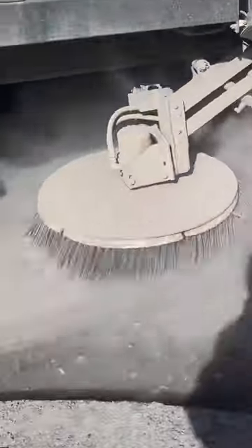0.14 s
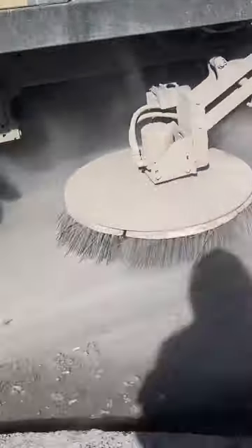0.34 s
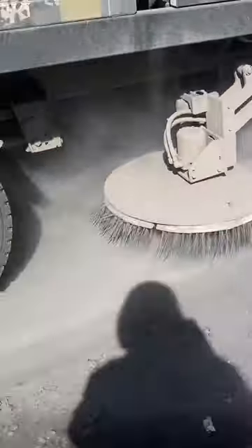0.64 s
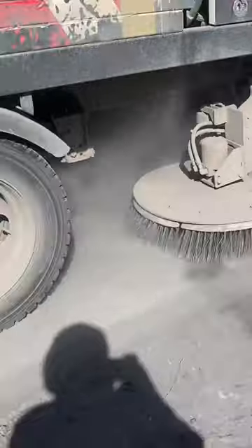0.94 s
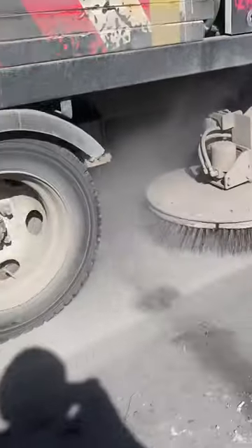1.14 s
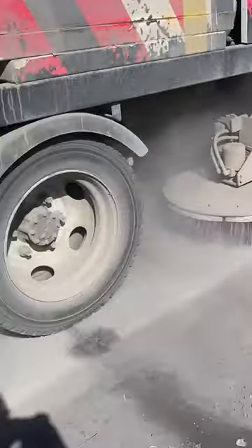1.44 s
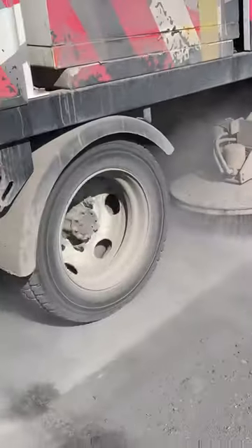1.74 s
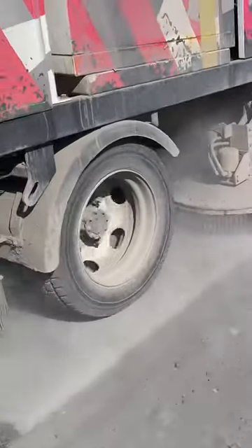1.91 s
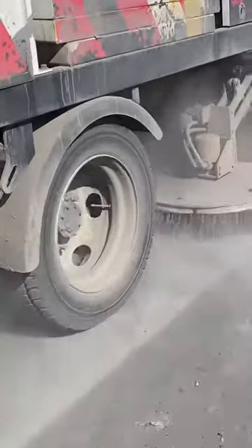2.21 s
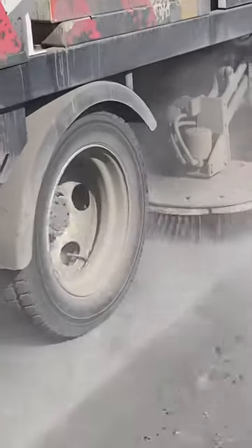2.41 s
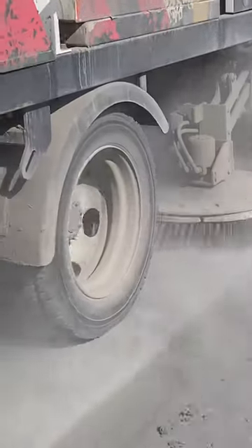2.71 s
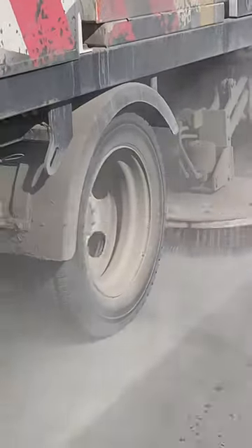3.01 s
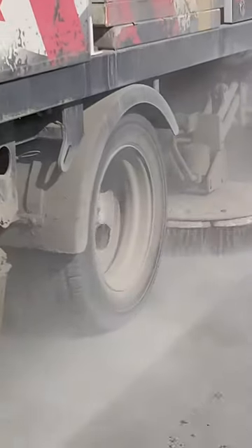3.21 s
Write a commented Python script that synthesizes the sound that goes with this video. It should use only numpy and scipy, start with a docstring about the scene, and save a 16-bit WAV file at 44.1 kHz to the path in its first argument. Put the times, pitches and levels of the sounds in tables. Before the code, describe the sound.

A road sweeper creeps past very close outdoors, sounding throughout. From 0 s a dense, very bright bristle hiss dominates, over a rough suction blower roar and a low, fluttering diesel rumble. The hiss weakens gradually until about 1.5 s, then stays nearly level. The blower surges briefly around 1.7 and 2.05 s, with faint wavering tones, then thins slightly; the engine keeps throbbing until the abrupt end near 3.4 s. Wide stereo.

```python
"""Road sweeper passing by

A road sweeper creeps past at arm's length outdoors and slowly draws away. Its diesel rumbles: wandering exhaust
tones over low noise that throbs with each crankshaft turn. Its suction blower roars: coloured noise in two
surging parts, with a few faint tones. Wire bristles of a disc brush hiss on dusty asphalt: dense random flicks,
heard with a strong peak near 12 kHz. Two microphone ports hear it all, partly alike and out of phase."""
import sys
import numpy as np
from scipy import signal
from scipy.fft import rfft, irfft
from scipy.io import wavfile
from scipy.ndimage import uniform_filter1d

SR = 44100
rng = np.random.default_rng(int(sys.argv[2]) if len(sys.argv) > 2 else 0)


def ratio(d):
    """dB to gain"""
    e = np.asarray(d, float) / 20
    return 10 ** e


def unload_audio(sound):
    """Save the sound as a 16-bit wav file, at the path given as the first command line argument."""
    columns = np.transpose(np.atleast_2d(sound))
    # keep every value between -1 and 1, then stretch to whole-number steps
    steps = np.round(np.clip(columns, -1, 1) * 32767)
    wavfile.write(sys.argv[1], SR, steps.astype(np.int16))


N = 148176
HZ = np.fft.rfftfreq(N, 1 / SR)

# uneven swells of the low rumble (taken around their mean) and strength of three beating exhaust orders:
# time_s, swell_db, third_db, fourth_db, sixth_db
ENGINE_CURVE = [(0.0, -54, -36, -45, -61), (0.07, -42, -45, -42, -38.5), (0.11, -52, -45, -45, -50),
                (0.18, -43, -60, -41, -52), (0.23, -50.5, -37, -42, -52), (0.42, -43, -37, -35.5, -38.5),
                (0.45, -44, -40, -45, -54), (0.54, -43, -47, -51, -39), (0.6, -43, -35, -39, -35.5),
                (0.73, -50, -41, -37, -38), (0.83, -37, -35.5, -59, -40), (0.91, -53, -39, -46, -49),
                (1.06, -39, -27.5, -41.5, -50), (1.12, -48, -52, -35, -43), (1.18, -44, -29, -43, -52),
                (1.23, -41, -44, -43, -42), (1.25, -47, -39, -37, -64), (1.33, -42, -30, -49, -46),
                (1.38, -48, -43, -56, -54), (1.43, -44, -30, -39, -48), (1.48, -47, -43, -49, -48),
                (1.54, -37, -36.5, -47, -39.5), (1.59, -52.5, -52, -46, -53),
                (1.65, -42, -34.5, -47, -36.5), (1.81, -43.5, -40, -32, -42.5),
                (1.91, -44, -29, -43, -43.5), (1.97, -40, -54, -49, -49), (2.03, -43, -39, -48, -45),
                (2.12, -42.5, -56, -51, -42), (2.17, -39, -34, -51, -44.5), (2.24, -49.5, -42, -34, -46.5),
                (2.34, -36, -37, -50, -43), (2.37, -49, -41, -28, -56), (2.41, -38, -33, -29, -45),
                (2.48, -42.5, -54, -30, -54), (2.56, -39, -45, -33, -43), (2.61, -49, -39, -54, -63),
                (2.65, -45, -46, -43, -43), (2.7, -36.5, -43, -41, -37), (2.75, -47, -45, -52, -48),
                (2.79, -41.5, -36, -51, -39), (2.85, -43, -39, -34, -52), (2.91, -42, -43, -52, -41),
                (2.97, -44.5, -47, -38, -49), (3.11, -42.5, -51, -50, -66), (3.15, -45, -32, -47, -44),
                (3.21, -44, -57, -53, -57), (3.25, -41.5, -51, -46, -51), (3.32, -50.5, -54, -60, -53),
                (3.36, -55, -51, -55, -58)]
# exhaust orders, levels added to the curve: multiple of the crankshaft rate, level_db, wander_width_hz
ENGINE_ORDERS = [(3, -0.5, 3.8), (4, -2.5, 9.7), (6, 0, 11)]
# spectrum of the body and exhaust rumble: frequency_hz, density_db (per Hz)
RUMBLE_COLOUR = [(20, -33), (35, -17), (55, -2.5), (84, 0), (115, -14), (165, -8.5), (215, -7.5),
                 (265, -9.5), (330, -21), (500, -27.5)]

# blower air flow as the truck turns its flank, before a common lift: time_s, low_roar_db, high_roar_db
BLOWER_CURVE = [(0, -37, -39), (.45, -37, -37.5), (.8, -40.5, -38.5), (1.1, -41, -37), (1.4, -43, -38.5),
                (1.58, -41, -38), (1.67, -37.5, -38), (1.8, -41.5, -40.5), (1.9, -44.5, -39),
                (2.05, -36, -40), (2.16, -43, -41.5), (2.4, -42.5, -42), (2.8, -42.5, -42), (3.1, -49, -42),
                (3.36, -45, -43.5)]
# spectrum of the blower roar: frequency_hz, density_db (per Hz)
BLOWER_COLOUR = [(150, 11), (330, -6.5), (430, 2), (540, 3.5), (620, 1), (850, 0.5), (1050, 0), (1400, 2.5),
                 (1950, 2), (2500, -0.5), (4000, -2), (5400, -4), (8000, -9)]
# blower tones, levels added to the curves below: pitch_hz, level_db, wander_width_hz
BLOWER_TONES = [(326.5, 1, 2.5), (466.5, -2, 5.4), (654.4, 0, 4.4)]
# the three blower tones come and go: time_s, first_db, second_db, third_db
TONE_CURVES = [(0.0, -43.5, -54, -57), (0.13, -54.5, -56, -45), (0.24, -65, -69, -54),
               (0.36, -49, -64, -53), (0.89, -66, -63, -58), (1.09, -50, -64, -59), (1.22, -62, -54, -54),
               (1.28, -57, -54, -68), (1.43, -50.5, -65, -61), (1.58, -50, -55, -63), (1.66, -51, -68, -56),
               (1.8, -47.5, -45, -50), (1.9, -56, -62, -54), (2.08, -45.5, -53, -61),
               (2.14, -61, -50.5, -54), (2.33, -44.5, -52.5, -62), (2.51, -67, -60, -67),
               (3.13, -56.5, -59.5, -73), (3.22, -73, -52, -56), (3.36, -74, -76, -70)]

# brush on the road, fading with distance, before a small lift: time_s, level_db
BRUSH_CURVE = [(0, -23.5), (.4, -24.5), (.9, -26), (1.4, -28), (1.68, -27.5), (1.9, -28.5), (2.5, -28.5),
               (3.05, -29.5), (3.36, -28.5)]
# spectrum of the bristle hiss as heard, nearly empty near 14.8 kHz: frequency_hz, density_db (per Hz)
BRUSH_COLOUR = [(2500, -40), (5400, -26), (6600, -19), (8600, -12.1), (10300, -8.5), (11200, -3.5),
                (12050, 0), (12620, -2.6), (13220, -9.6), (13750, -16), (14200, -29), (14600, -45),
                (15050, -45), (15250, -25), (16000, -24)]

# stereo likeness, phase and balance as heard:
# frequency_hz, likeness (0 to 1), left_lead_rad, left_minus_right_db
PORTS = [(100, .98, -.2, .4), (400, .89, -.1, .3), (650, .6, .4, -4), (850, .85, 1.4, 0),
         (1200, .75, 1.4, 0), (1500, .72, 3.5, -3.4), (1900, .7, 5.0, -.8), (2300, .88, 6.3, 0),
         (2700, .3, 7.4, -.3), (3300, .2, 7.3, -.5), (4000, .45, 6.5, -1.5), (4700, .25, 7.8, -3.4),
         (5400, .55, 9.2, -3.7), (6000, .15, 11.5, -3.8), (6600, .8, 12.5, 0), (7200, .45, 11.6, .4),
         (7600, .85, 10.2, 0), (7800, .89, 9.75, 0), (8200, .93, 9.55, 0), (8350, 1, 9.425, 0),
         (8850, 1, 9.425, 0), (9100, .85, 9.1, 0), (9600, .72, 8.2, 0), (10250, .83, 7.0, 0),
         (10400, .96, 6.5, 0), (10700, 1, 6.283, 0), (11050, 1, 6.283, 0), (11600, .985, 6.1, 0),
         (11800, .95, 5.3, 0), (12600, .94, 4.35, 0), (12950, .88, 3.6, 0), (13150, 1, 3.142, 0),
         (14600, 1, 3.142, 0), (14900, 1, 0, 0)]

CRANK_HZ, CRANK_WANDER = 23.99, 0.0265  # mean crankshaft turns per second; spread as a share of it
THROB_DB, LOPE_DB = 1, 1  # peak swing of the rumble once a turn; of the orders once every two turns
RUMBLE_DB, RUMBLE_FLICKER_DB = -37.5, 0.1
RUMBLE_FOLLOWS = 0.66  # dB of rumble per dB of swell
BLOWER_LIFT_DB, BLOWER_FLICKER_DB = 4, 0.3
PATCHY_DB, PATCHES_PER_S = 1.0, 8.5  # spread of the swells; cutoff of their drift in Hz
BRUSH_LIFT_DB, BRUSH_FLICKER_DB = 1, 0.55
BRISTLES_PER_S, BRISTLE_SPREAD_DB = 34000, -1.3  # flicks per second; mean random weakening
STREAK_DB, STREAK_FROM_HZ = 2.2, 600
LOW_CUT_HZ = 40


def rms_one(x):
    """Scales a signal to rms 1."""
    return x / np.sqrt(np.mean(x ** 2) + 1e-20)


def in_time(rows):
    """Draws the columns of a time curve as straight lines, one value for every sample."""
    time_s, *columns = np.transpose(rows)
    return [np.interp(np.arange(N) / SR, time_s, column) for column in columns]


def drift(rate_hz):
    """Slow chance of spread 1: noise at every 40th sample, twice through a one-pole low-pass."""
    r = np.exp(-80 * np.pi * rate_hz / SR)
    noise = rng.standard_normal(N // 40 + 2002)
    slow = signal.lfilter([1], [1, -2 * r, r * r], noise)[2000:]  # skips the filter's start
    return np.interp(np.arange(N) / 40, np.arange(len(slow)), rms_one(slow))


def flutter(rate_hz):
    """Drift without its slowest swings, with spread 1."""
    chance = drift(rate_hz)
    return rms_one(chance - uniform_filter1d(chance, size=SR // 9))


def coloured(x, colour):
    """Filters two streams with a spectrum curve and scales them together to rms 1."""
    hz, db = np.transpose(colour)
    gain = ratio(np.interp(np.log(HZ + 1), np.log(hz), db))
    return rms_one(irfft(rfft(x) * gain, N))


def rough_tone(turns, width_hz, steady):
    """Two streams of a tone, each a steady part plus one of wandering strength and phase; rms about 1."""
    steady = np.clip(steady, 0, 1)  # share of the power that does not wander
    streams = []
    for _ in range(2):
        constant = np.sqrt(steady) * np.exp(2j * np.pi * rng.random())
        wander = np.sqrt((1 - steady) / 2) * (drift(width_hz) + 1j * drift(width_hz))
        streams.append(np.real((constant + wander) * np.exp(2j * np.pi * turns)))
    return np.array(streams) * np.sqrt(2)


def patchy(x):
    """Lets every third of an octave from 400 Hz to about 5 kHz swell and sink on its own."""
    spectrum, out = rfft(x), x.copy()
    for hz in 400 * 2 ** (np.arange(12) / 3):
        bell = np.maximum(1 - 3 * np.abs(np.log2((HZ + 1) / hz)), 0)
        swell = ratio(PATCHY_DB * drift(PATCHES_PER_S))
        out += irfft(spectrum * bell, N) * (swell - 1)
    return out


def streaky(x):
    """Breaks sound into streaks about 60 Hz wide and 50 ms long, each louder or softer than the next."""
    hz, _, cells = signal.stft(x, SR, nperseg=1024)
    noise = rng.standard_normal(cells.shape[1:])
    chance = rms_one(uniform_filter1d(noise, size=4, axis=1))  # smooth along time
    gain = rms_one(ratio(STREAK_DB * chance))
    gain = np.where(hz[:, None] > STREAK_FROM_HZ, gain, 1)
    return signal.istft(cells * gain, SR, nperseg=1024)[1][:, :N]


def exhaust_orders(turns, orders_db):
    """Rough tones at multiples of the crankshaft rate; uneven cylinders make them throb
    once every two turns, one four-stroke cycle."""
    orders = 0
    for (multiple, db, width_hz), now_db in zip(ENGINE_ORDERS, orders_db):
        orders = orders + ratio(db + now_db) * rough_tone(multiple * turns, width_hz, steady=0.85)
    return orders * ratio(LOPE_DB * np.cos(np.pi * turns + 1.65 * drift(2.3)))


def rumble(turns, swell_db):
    """Low body and exhaust noise that follows the swell curve and throbs once per crankshaft turn."""
    throb_db = THROB_DB * np.cos(2 * np.pi * turns) + RUMBLE_FLICKER_DB * drift(22.0)
    follow_db = RUMBLE_FOLLOWS * (swell_db - swell_db.mean())
    noise = coloured(rng.standard_normal((2, N)), RUMBLE_COLOUR)
    return ratio(RUMBLE_DB + follow_db + throb_db) * noise


def engine():
    """Diesel: exhaust orders and rumble share one crankshaft whose speed wanders."""
    turns = np.cumsum(CRANK_HZ * (1 + CRANK_WANDER * drift(2.8))) / SR  # crankshaft turns so far
    swell_db, *orders_db = in_time(ENGINE_CURVE)
    return exhaust_orders(turns, orders_db) + rumble(turns, swell_db)


def blower_roar():
    """Turbulent air as patchy noise, split near 1200 Hz into two parts that surge apart."""
    low_db, high_db = in_time(BLOWER_CURVE)
    air = patchy(coloured(rng.standard_normal((2, N)), BLOWER_COLOUR))
    low = signal.sosfilt(signal.butter(1, 1200, fs=SR, output="sos"), air)
    high = air - low
    low = low * ratio(low_db + BLOWER_FLICKER_DB * flutter(3.4))
    high = high * ratio(high_db + BLOWER_FLICKER_DB * flutter(4.6))
    return ratio(BLOWER_LIFT_DB) * (low + high)


def blower_tones():
    """Faint blower tones that waver in strength and phase, and come and go."""
    tones = 0
    for (hz, db, width_hz), now_db in zip(BLOWER_TONES, in_time(TONE_CURVES)):
        turns = hz * np.arange(N) / SR
        tones = tones + ratio(db + now_db) * rough_tone(turns, width_hz, steady=0.76)
    return tones


def blower():
    """Suction blower: the roar of its air flow plus its tones."""
    return blower_roar() + blower_tones()


def brush():
    """Dense bristle flicks of uneven size blur into a hiss whose strength flutters."""
    hits = rng.random((2, N)) < BRISTLES_PER_S / SR
    flicks = hits * rng.standard_normal((2, N))
    flicks = flicks * ratio(BRISTLE_SPREAD_DB * rng.exponential(1, (2, N)))
    level_db = in_time(BRUSH_CURVE)[0] + BRUSH_LIFT_DB + BRUSH_FLICKER_DB * flutter(28.0)
    return ratio(level_db) * coloured(flicks, BRUSH_COLOUR)


def scene():
    """Two unrelated streams of one machine: sound both ports share, and the scattered part."""
    return engine() + streaky(blower() + brush())


def roll_off(x):
    """The treble ends steeply here."""
    return signal.sosfilt(signal.butter(12, 15800, fs=SR, output="sos"), x)


def record(dry):
    """After a low cut, two ports mix shared and scattered sound, shifted in phase and uneven in level."""
    hz, *columns = np.transpose(PORTS)
    alike, lead_rad, lean_db = [np.interp(HZ, hz, column) for column in columns]
    alike = np.clip(alike, 0, 1)
    low_cut = signal.butter(2, LOW_CUT_HZ, "high", fs=SR, output="sos")
    spectra = rfft(signal.sosfilt(low_cut, dry))
    shared = spectra[0] * np.sqrt((1 + alike) / 2)
    scattered = spectra[1] * np.sqrt((1 - alike) / 2)
    turn = np.exp(0.5j * lead_rad) * ratio(lean_db / 2)  # half to the left, the opposite half to the right
    left, right = (shared + scattered) * turn, (shared - scattered) / turn
    return roll_off(irfft(np.array([left, right]), N))


dry = scene()
out = record(dry)
unload_audio(out)
```